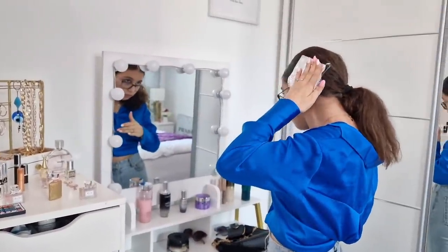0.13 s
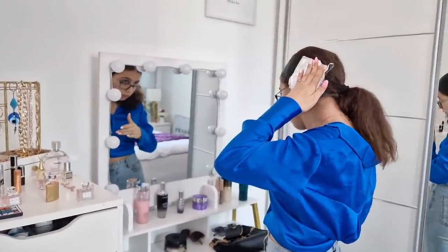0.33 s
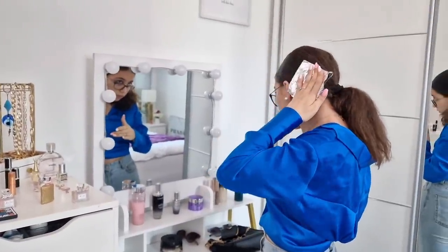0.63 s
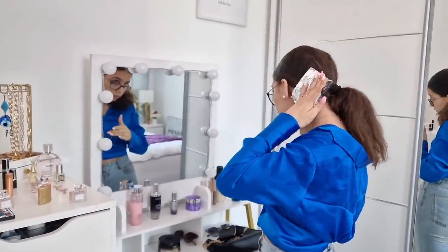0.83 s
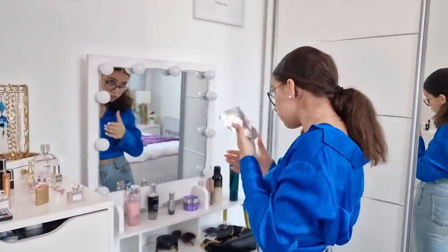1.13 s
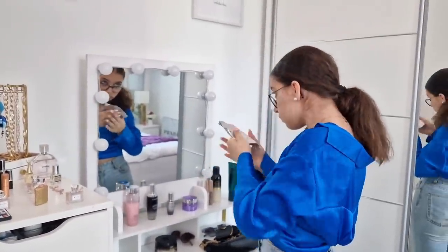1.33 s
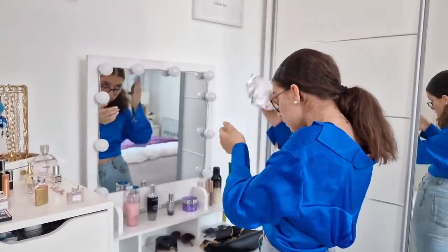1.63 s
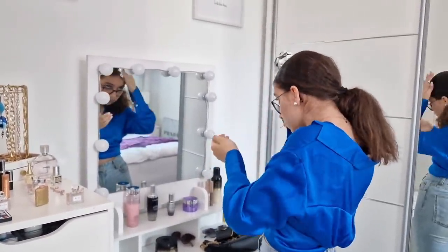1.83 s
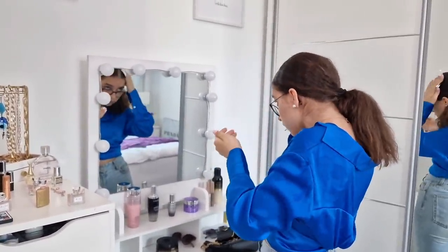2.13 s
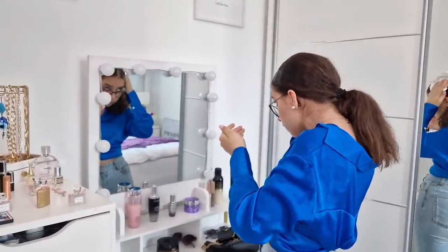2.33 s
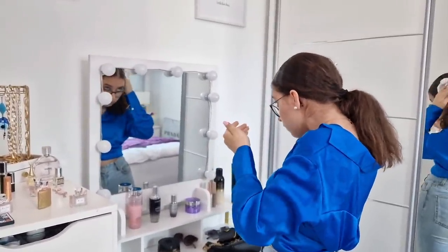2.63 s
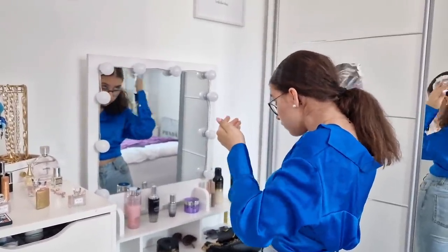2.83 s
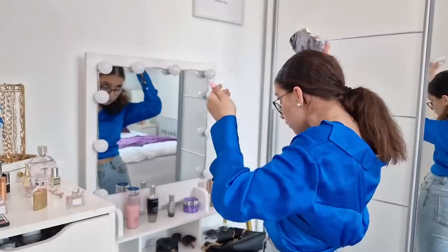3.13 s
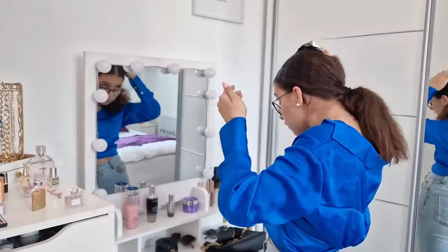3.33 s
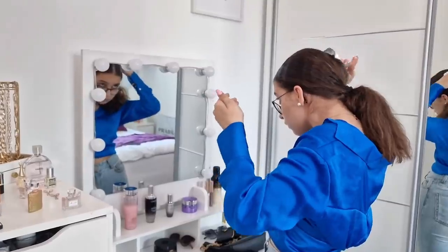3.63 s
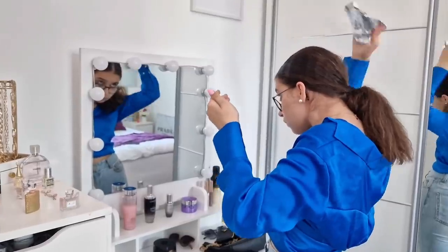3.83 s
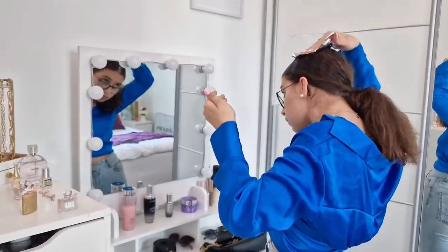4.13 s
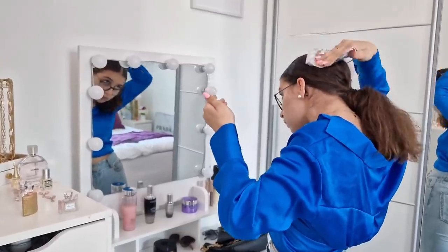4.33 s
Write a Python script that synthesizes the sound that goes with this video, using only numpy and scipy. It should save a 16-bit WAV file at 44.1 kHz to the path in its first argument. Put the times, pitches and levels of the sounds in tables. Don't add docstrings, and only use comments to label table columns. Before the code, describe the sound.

Dry, bright hair rustle in uneven strokes, close to a camera microphone in a small bedroom with a short soft echo. Gentle brushing and a boomy body rumble open it; the rumble fades after a second. Fuller swishes follow, with sharp catches, soft sleeve bumps and one firm pat, then a smoother stretch, and finally brief crisp strokes with small hollow pops over faint room hiss.

```python
import sys
import numpy as np
from scipy import signal
from scipy.io import wavfile
from scipy.ndimage import uniform_filter1d

SR = 44100
rng = np.random.default_rng(int(sys.argv[2]) if len(sys.argv) > 2 else 0)


def store_wav(level_fs):
    pcm = np.round(np.clip(np.atleast_2d(level_fs), -1, 1) * 32767)
    wavfile.write(sys.argv[1], SR, pcm.T.astype(np.int16))


def boost(x):
    u = np.asarray(x, float) / 20
    return 10 ** u


N = 197391

# (frequency [Hz], density [dB per Hz])
STILL_SPECTRUM = [(15, -27), (25, 11), (133, 11), (289, 0.5), (368, 1), (631, -3.5), (895, -2), (2630, -16),
                  (3720, -3.5), (8810, 2.5), (15500, -43)]
STILL_DB = -67
# (frequency [Hz], correlation [-1..1])
PORT_LIKENESS = [(60, 0.72), (180, 0.55), (400, 0.37), (700, 0.65), (1100, 0.43), (3000, 0.16),
                 (8000, 0.032)]
# (time [s], peak [dB], centre [Hz], left minus right [dB])
SNAGS = [(0.0201, -36, 5750, 8), (0.23, -36, 5600, 5), (0.2504, -36, 4200, 2), (0.419, -50, 4960, -6),
         (0.482, -36.5, 3040, 2), (0.5175, -36, 3300, 9), (0.787, -37, 9300, 0.1), (0.8791, -33.5, 2900, 0),
         (0.9592, -33, 5800, 3), (0.9918, -33.5, 3550, 5), (1.038, -37, 4100, 3), (1.1507, -32, 5050, 4),
         (1.1729, -26, 3580, -4), (1.2228, -31.5, 3120, -3), (1.3587, -32, 5270, 1),
         (1.3874, -36, 2920, 0.5), (1.4485, -32.5, 5740, 1), (1.468, -28, 8000, -1), (1.8137, -24, 6700, 2),
         (1.9555, -31, 8500, -0.5), (2.1164, -18.5, 5570, 1), (2.1809, -26.5, 5470, 6),
         (3.2663, -42, 7460, -4), (3.288, -31, 10500, -6), (3.379, -34.5, 2840, 0),
         (3.5044, -33, 10300, -2), (3.857, -38, 3200, 0.5), (3.899, -33.5, 4200, -3),
         (4.0594, -28, 7340, 0), (4.129, -36.5, 1950, 4)]
SPRAY_SHARE, SPRAY_T60_S = 0.22, 0.091
# (frequency [Hz], density [dB per Hz])
HAIR_SPECTRUM = [(240, -29.5), (400, -21), (488, -83), (663, -16.5), (1170, -16), (1450, -5.5), (1850, -6),
                 (3010, 0.5), (4840, 0.5), (5390, 1), (8930, -1), (14800, -1.5), (15500, -4.5)]
# (frequency [Hz], left minus right [dB])
LEAN = [(60, 7), (240, -2), (950, 0.5), (3770, 1), (15000, -2)]
# (frequency [Hz], width [Hz], level [dB])
PAD_MODES = [(665, 34, 1.5), (818, 23, -3.5), (974, 41, -14), (1350, 88, -22.5), (2004, 24, -1.5)]
# (peak time [s], strength [dB], 20 dB rise [s], 20 dB fall [s], pressure [dB])
NEAR_STROKES = [(0.025, -50.5, 0.13, 0.58, -1.5), (0.269, -47, 0.12, 0.28, 2.5),
                (0.419, -51, 0.063, 0.023, 0), (0.545, -43.5, 0.082, 0.24, -0.5),
                (0.815, -49, 0.11, 0.06, 0.5), (0.88, -50, 0.17, 0.064, -1.5), (1.002, -55, 0.24, 0.09, 3),
                (1.078, -48.5, 0.22, 0.1, -0.5), (1.185, -40.5, 0.13, 0.15, 1.5),
                (1.246, -49.5, 0.049, 0.25, -4), (1.358, -47, 0.011, 0.13, -6.5)]
# (peak time [s], strength [dB], 20 dB rise [s], 20 dB fall [s], pressure [dB])
FAR_STROKES = [(1.467, -49.5, 0.01, 0.37, 0.5), (1.553, -38.5, 0.08, 0.27, -5.5),
               (1.673, -38, 0.074, 0.25, 1.5), (1.777, -43.5, 0.26, 0.11, -0.0),
               (1.897, -53.5, 0.03, 0.14, 1.5), (1.963, -46.5, 0.097, 0.088, -3.5),
               (2.105, -33.5, 0.058, 0.14, 3.5), (2.182, -42, 0.083, 0.16, -4.5),
               (2.305, -40.6, 0.18, 0.38, -1.5), (2.538, -42, 0.06, 0.39, -3),
               (2.709, -41.5, 0.38, 0.19, -1.5), (2.79, -46.5, 0.068, 0.24, -1.0),
               (2.931, -45, 0.33, 0.28, 0.5), (3.08, -47.5, 0.72, 0.098, -3)]
# (peak time [s], strength [dB], 20 dB rise [s], 20 dB fall [s], pressure [dB])
CROWN_STROKES = [(3.185, -55, 0.024, 0.069, -3), (3.29, -49.5, 0.015, 0.11, -4),
                 (3.385, -52, 0.033, 0.23, 3), (3.478, -55.5, .033, 0.054, -4.5),
                 (3.518, -40.5, 0.02, 0.18, -0.5), (3.69, -46, 0.22, 0.3, -1.5),
                 (3.79, -52.5, 0.098, .2, 3.5), (3.865, -52.5, .03, 0.18, -0.5),
                 (3.925, -43, 0.07, 0.27, .6), (4.019, -47, .12, .2, 5), (4.128, -54.5, 0.018, .08, 11),
                 (4.245, -53.5, 0.14, 0.24, -0.5), (4.335, -49.5, 0.14, 0.2, -2.5),
                 (4.385, -43, .05, 0.15, 0.5), (4.441, -43.5, 0.079, 0.18, 3.5)]
SIDE_FIZZ_DB = [-1.5, 0.56, 1]
SIDE_BODY_DB = [-3, .5, -1.4]
USUAL_DB, RESTING_DB = -47, -70
BODY_PER_PRESSURE, BODY_PER_STRENGTH = 0.7, 0.22
DRAG_PER_PRESSURE, DRAG_PER_STRENGTH = 1.04, 0.28
EDGE_OCTAVES_PER_DB = 0.14
LIFT_OFF = 1.1
# (peak time [s], push [dB], 20 dB rise [s], 20 dB fall [s], favoured mode group [0-2])
SHOVES = [(.03, -65.5, .2, 0.19, 0.12), (0.192, -43.5, 0.039, 0.21, 1.53), (.23, -45.5, 0.057, .2, .2),
          (.3, -42, 0.13, 0.14, 0.8), (.36, -44, .15, 0.098, .05), (.49, -49.5, 0.087, 0.29, 0.4),
          (0.591, -53, 0.19, 0.11, 2), (.64, -50.5, 0.18, .2, 0.15), (.73, -50.5, 0.15, 0.1, 0.84),
          (.81, -54.5, 0.081, 0.092, .1), (.91, -65, 0.045, 0.061, 0.75), (1.19, -66.5, 0.036, 0.15, 0.5),
          (1.27, -67, .05, 0.1, 0.49), (1.74, -58.5, 0.075, .15, 1.25), (1.82, -61, 0.12, 0.061, 0.16),
          (2.2, -74, .15, .2, .1), (2.36, -73.5, .15, .25, 1.4), (2.72, -69, 0.21, 0.11, 0.49),
          (3.36, -66.5, 0.19, 0.57, .1), (3.47, -68.5, 0.24, 0.37, 1.66), (4.47, -67.5, 0.25, .2, .1)]
NEIGHBOUR_DB, STANDING_DB = -13.5, -92.5
# (frequency [Hz], width [Hz], level [dB])
ROOM_MODES = [
    [(47, 12, 0)],
    [(116, 11, 0)],
    [(187, 13, 0), (235, 30, -14), (310, 40, -20), (410, 25, -30)],
]
# (time [s], peak [dB], pitch [Hz], T60 [s])
BUMPS = [(.152, -54.5, 288, 0.064), (.47, -62, 294, 0.09), (1.185, -58.5, 141, 0.086),
         (1.263, -80, 129, 0.089), (1.673, -52, 442, 0.13), (1.736, -46, 124, 0.079), (1.75, -62, 240, .08),
         (2.298, -55.5, 495, 0.079), (2.32, -57.5, 260, 0.094)]
# (time [s], peak [dB], pitch [Hz], T60 [s])
POPS = [(1.15, -58, 756, 0.045), (1.565, -56.5, 655, 0.28), (1.68, -61, 676, 0.15),
        (2.095, -44, 705, 0.058), (2.177, -45, 756, 0.042), (2.30, -56, 834, 0.069), (2.53, -63, 790, 0.08),
        (2.66, -43.5, 916, 0.04), (2.695, -41.5, 1350, 0.059), (2.965, -51.5, 680, 0.049),
        (3.515, -53, 720, 0.064), (3.95, -52.5, 665, 0.071), (4.015, -44.5, 816, 0.039)]
# (frequency [Hz], level [dB], T60 [s])
THUD = (2.0905, -44.5, [(144, 5.5, 0.012), (198, -10, 0.067), (254, -2.5, 0.096), (314.5, -7.5, 0.11)])
# (frequency [Hz], T60 [s])
ROOM_T60 = [(300, 0.25), (2000, 0.22), (8000, 0.17), (16000, 0.12)]
LEFT_LAG_SAMPLES = 2
EDGE_HZ = 15600


def evened(x):
    return x / np.sqrt(np.mean(x ** 2) + 1e-20)


def read(points, hz):
    f, value = np.transpose(points)
    return np.interp(np.log(hz + 1), np.log(f + 1), value)


def add(mix, s, sound):
    part = mix[..., round(s * SR):][..., :sound.shape[-1]]
    part += sound[..., :part.shape[-1]]


def resonate(x, hz, width_hz):
    turn = np.exp(2j * np.pi * hz * np.arange(x.shape[-1]) / SR)
    r = np.exp(-np.pi * width_hz / SR)
    smooth = signal.lfilter([1 - r], [1, -r], x / turn)
    return 2 * (turn * smooth).real


def paired(z, hz):
    same = np.clip(read(PORT_LIKENESS, hz), -1, 1)[:, None]
    return np.array([z[0], same * z[0] + np.sqrt(1 - same ** 2) * z[1]])


def patches(shape, bins, frames):
    blurred = uniform_filter1d(rng.standard_normal(shape), size=bins, axis=0)
    return evened(uniform_filter1d(blurred, size=frames, axis=1))


def swells(table, t, rest_db):
    s, db, rise_s, fall_s = np.transpose(table)[:4, :, None]
    rising = (s - t) / np.maximum(rise_s, 0.005)
    falling = (t - s) / np.maximum(fall_s, 0.005)
    slope = np.maximum(rising, falling)
    return np.vstack([boost(db - 20 * slope ** LIFT_OFF) ** 2, boost(rest_db) ** 2 + 0 * t])


def still_air():
    hz, t, z = signal.stft(rng.standard_normal((2, N)), SR, nperseg=2048)
    unrest_db = 0.18 * patches(z.shape[1:], bins=8, frames=3)
    z = paired(z, hz) * boost(read(STILL_SPECTRUM, hz)[:, None] + unrest_db)
    return boost(STILL_DB) * evened(signal.istft(z, SR, nperseg=2048)[1][:, :N])


def snags():
    out, t = np.zeros((2, N)), np.arange(9000) / SR
    thin = signal.butter(3, 2200, "high", fs=SR)
    noises = rng.standard_normal((len(SNAGS), 2, len(t)))
    for (s, db, hz, pan_db), noise in zip(SNAGS, noises):
        flick = 1.2 * np.sin(2 * np.pi * hz * t) * boost(-60 * t / 0.0036)
        rattle = 0.35 * evened(resonate(noise, hz, 3000)) * boost(-60 * t / 0.031)
        spray = 0.5 * SPRAY_SHARE * signal.lfilter(*thin, noise)
        spray = spray * boost(-60 * t / SPRAY_T60_S) * np.minimum(t / 0.0052, 1)
        level = boost(db + np.array([[0.5], [-0.5]]) * pan_db)
        add(out, s, level * (flick + rattle + spray) * np.minimum(t / 0.00028, 1))
    return signal.lfilter(*signal.butter(4, 1900, "high", fs=SR), out)


def hand(t):
    sides = [NEAR_STROKES, FAR_STROKES, CROWN_STROKES]
    rows = np.concatenate(sides)
    power = swells(rows, t, RESTING_DB)
    total = power.sum(0)
    share = power[:-1] / total
    counts = [len(side) for side in sides]
    body_db, fizz_db = np.repeat([SIDE_BODY_DB, SIDE_FIZZ_DB], counts, axis=1) @ share
    return 10 * np.log10(total), rows[:, 4] @ share, body_db, fizz_db


def strands(slips_per_s=16000, spread_db=4.0, patchy_db=0.85, streaky_db=1.83, flicker_db=1.18):
    chance = rng.random((2, N))
    size = rng.exponential(1, (2, N))
    sign = rng.standard_normal((2, N))
    slips = (chance < slips_per_s / SR) * boost(spread_db * np.minimum(size, 2.2)) * sign
    hz, t, z = signal.stft(evened(slips), SR, nperseg=256, noverlap=192)
    f = hz[:, None]

    strength_db, pressure_db, side_body_db, fizz_db = hand(t)
    extra_db = strength_db - USUAL_DB
    body_db = side_body_db + BODY_PER_PRESSURE * pressure_db + BODY_PER_STRENGTH * extra_db
    drag_db = DRAG_PER_PRESSURE * pressure_db + DRAG_PER_STRENGTH * extra_db
    drag_edge_hz = 2400 * 2 ** (-EDGE_OCTAVES_PER_DB * drag_db)
    body = 1 / (1 + (f / 1200) ** 5)
    drag = 1 / (0.5 + (f / drag_edge_hz) ** 6) - body
    fizz = np.clip(np.log2(f / 6000 + 0.025), 0, 1)
    colour_db = read(HAIR_SPECTRUM, hz)[:, None] + body * body_db + drag * drag_db + fizz * fizz_db

    grain_db = flicker_db * patches((1, len(t)), bins=1, frames=3)
    grain_db = grain_db + patchy_db * patches(z.shape[1:], bins=8, frames=30)
    grain_db += streaky_db * patches(z.shape[1:], bins=2, frames=20)

    band = (hz > 2500) & (hz < 9000)
    band_rms = np.sqrt(2 * np.sum(boost(2 * read(HAIR_SPECTRUM, hz[band]))) / 256)
    lean_db = np.array([0.5, -0.5])[:, None, None] * read(LEAN, hz)[:, None]
    z = paired(z, hz) * (boost(colour_db + grain_db) / band_rms) * boost(lean_db)
    rustle = signal.istft(z, SR, nperseg=256, noverlap=192)[1][:, :N]
    pad_ring = sum(boost(db) * resonate(rustle, mode_hz, width) for mode_hz, width, db in PAD_MODES)
    return (rustle + pad_ring) * boost(np.interp(np.arange(N) / SR, t, strength_db) + 1.0)


def movement():
    t, out = np.arange(0, N + 200, 200) / SR, np.zeros((2, N))
    power = swells(SHOVES, t, STANDING_DB)
    favoured = np.transpose(SHOVES)[4]
    for k, modes in enumerate(ROOM_MODES):
        reach = boost(NEIGHBOUR_DB * (k - favoured) ** 2) ** 2
        push = np.sqrt(reach @ power[:-1] + power[-1])
        shove = rng.standard_normal((2, N))
        shove = shove[0] + 0.06 * shove[1] * np.array([[1], [-1]])
        ring = np.zeros((2, N))
        for hz, width, db in modes:
            once = resonate(shove, hz, 1.84 * width)
            ring += boost(db) * evened(resonate(once, hz, 1.84 * width))
        swing = np.sqrt(uniform_filter1d(ring[0] ** 2, size=3000) + 0.084)
        out += np.interp(np.arange(N) / SR, t, push) * evened(ring / swing)
    return out


def hollow_knocks(table, rise_s, overtone, overtone_db):
    out, t = np.zeros(N), np.arange(7000) / SR
    for s, db, hz, t60_s in table:
        ring = np.sin(2 * np.pi * hz * t) + boost(overtone_db) * np.sin(2 * np.pi * overtone * hz * t)
        add(out, s, boost(db - 60 * t / t60_s) * (1 - np.exp(-t / rise_s)) * ring)
    return out


def bumps():
    return hollow_knocks(BUMPS, rise_s=0.0096, overtone=2.3, overtone_db=0)


def pops():
    return hollow_knocks(POPS, rise_s=0.004, overtone=1.3, overtone_db=-8)


def thud():
    s, db, modes = THUD
    out, t = np.zeros(N), np.arange(10000) / SR
    held = np.maximum(t - 0.022, 0)
    ring = sum(boost(d - 60 * held / t60_s) * np.sin(2 * np.pi * hz * t) for hz, d, t60_s in modes)
    add(out, s, -boost(db) * ring * (1 - np.exp(-t / 0.001)))
    return out


def room(x):
    taps = np.zeros((2, SR // 2))
    at = np.arange(200, SR // 2 - 20, 20)
    at = at + rng.integers(0, 20, (2, len(at)))
    np.put_along_axis(taps, at, rng.choice([-1., 1.], at.shape), 1)
    hz, t, z = signal.stft(taps, SR, nperseg=256)
    decay = boost(-60 * t / read(ROOM_T60, hz)[:, None])
    tail = signal.istft(z * decay, SR, nperseg=256)[1]
    return signal.fftconvolve(x, tail / np.linalg.norm(tail[0]), axes=1)[:, :N]


def scene():
    sharp, rustle, pad, pat = snags(), strands(), pops(), thud()
    low = movement() + pat + bumps()
    echo = room(boost(-9.0) * rustle + boost(-1.5) * sharp + boost(-2.5) * pad)
    echo += room(boost(-16) * pat[None])
    left, right = rustle + sharp + pad + low
    return np.array([np.roll(left, LEFT_LAG_SAMPLES), right]) + echo + still_air()


def top_cut(x):
    return signal.sosfilt(signal.butter(12, 16800, fs=SR, output="sos"), x)


def record(dry):
    low_pass = signal.firwin(801, EDGE_HZ, window=("kaiser", 7), fs=SR)
    limited = signal.oaconvolve(dry, low_pass[None], "same")
    return top_cut(limited)


dry = scene()
out = record(dry)
store_wav(out)
```